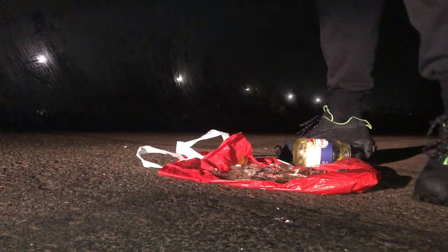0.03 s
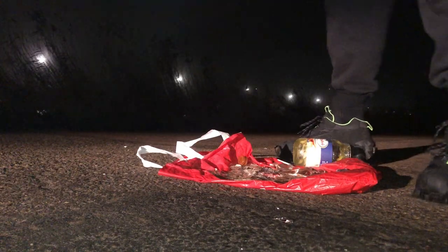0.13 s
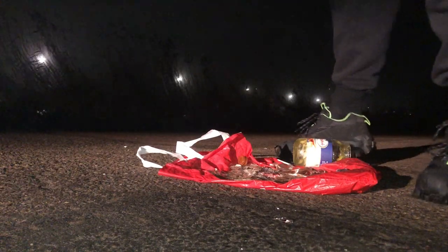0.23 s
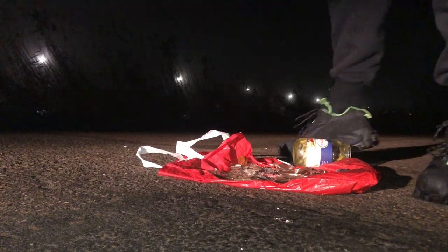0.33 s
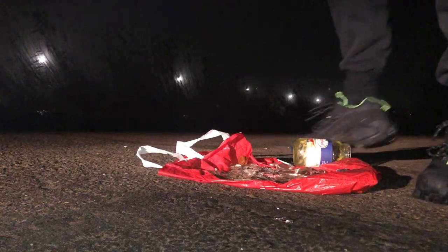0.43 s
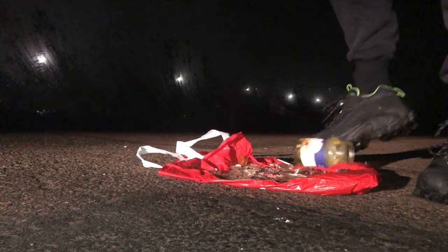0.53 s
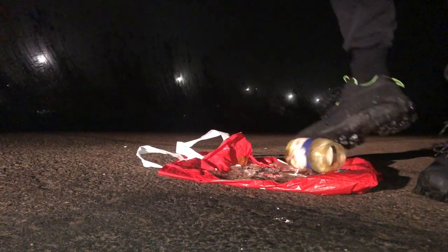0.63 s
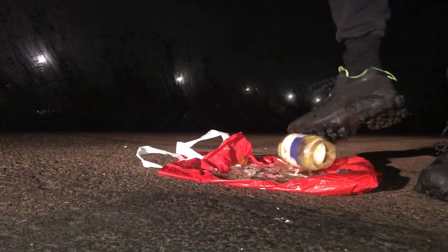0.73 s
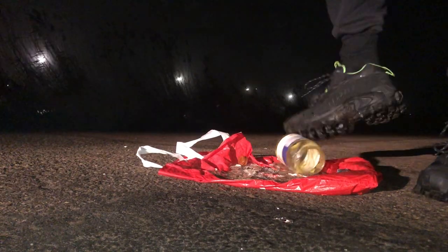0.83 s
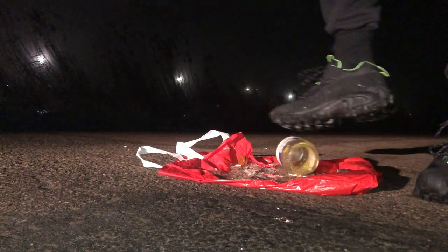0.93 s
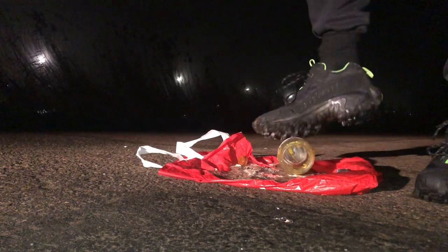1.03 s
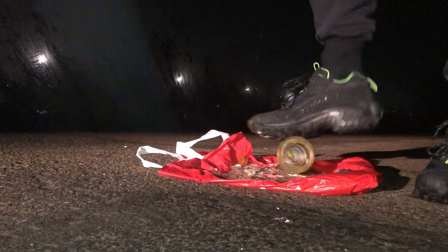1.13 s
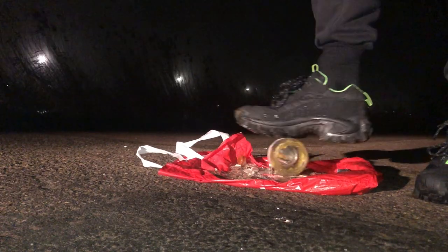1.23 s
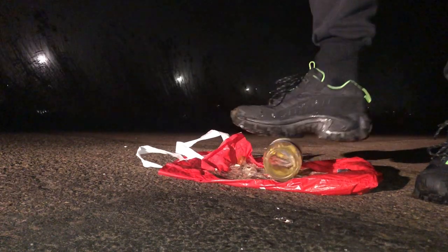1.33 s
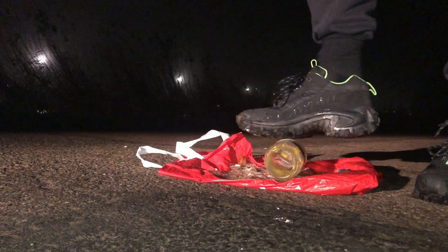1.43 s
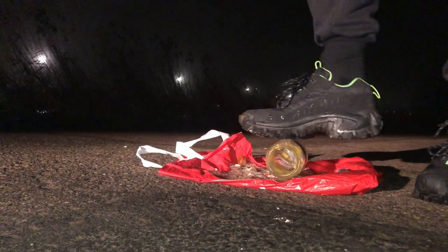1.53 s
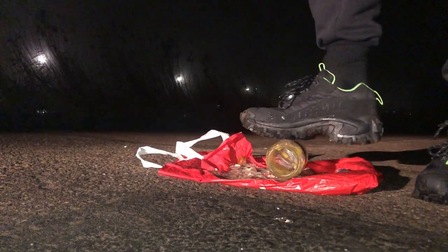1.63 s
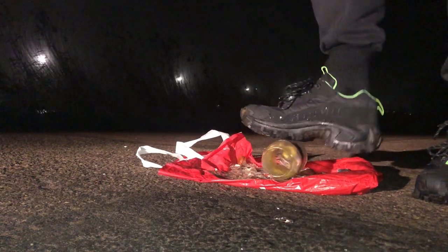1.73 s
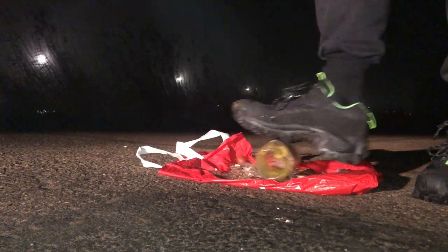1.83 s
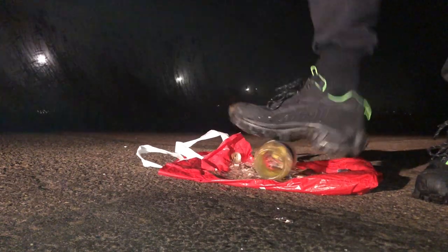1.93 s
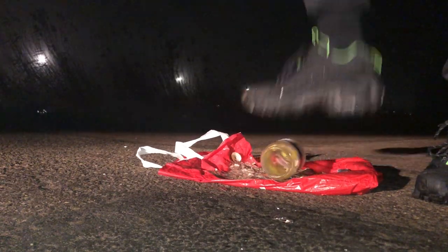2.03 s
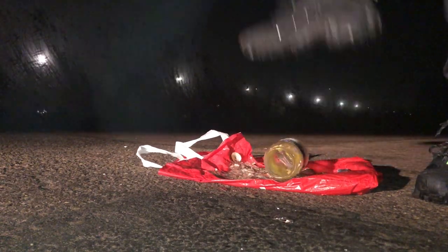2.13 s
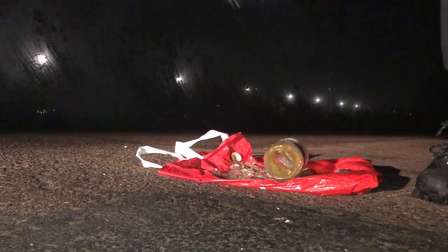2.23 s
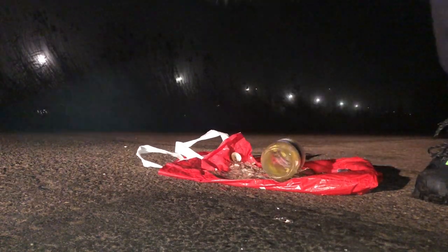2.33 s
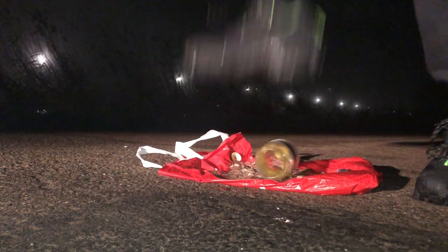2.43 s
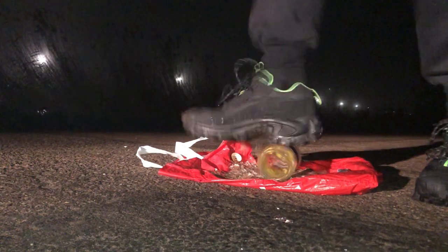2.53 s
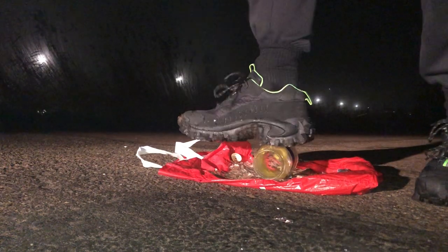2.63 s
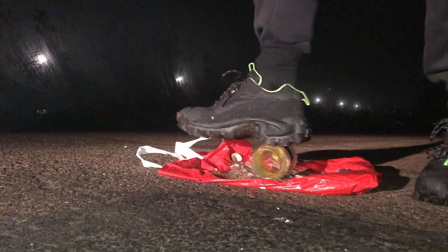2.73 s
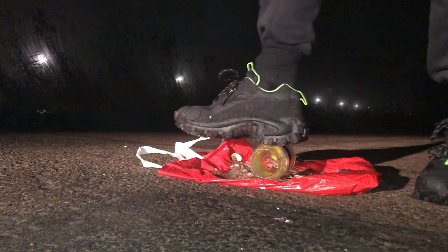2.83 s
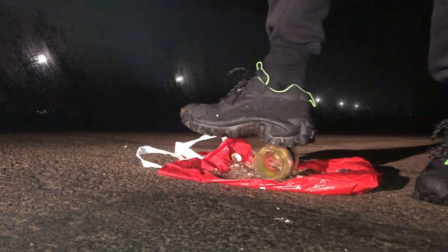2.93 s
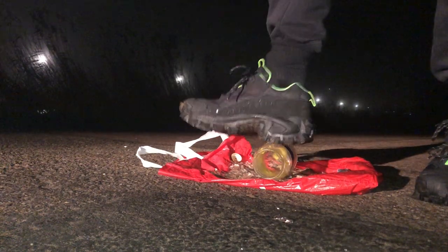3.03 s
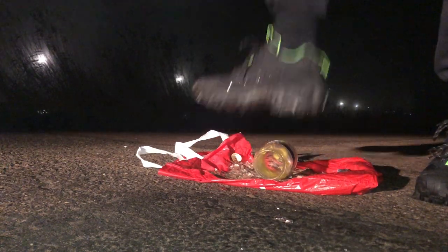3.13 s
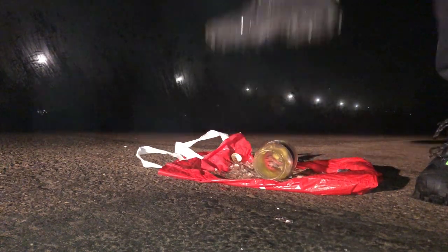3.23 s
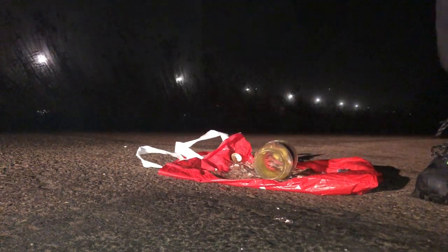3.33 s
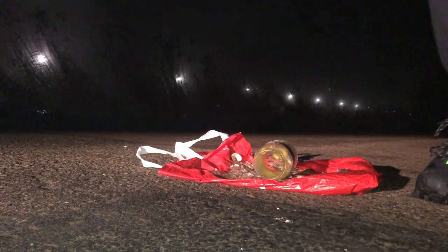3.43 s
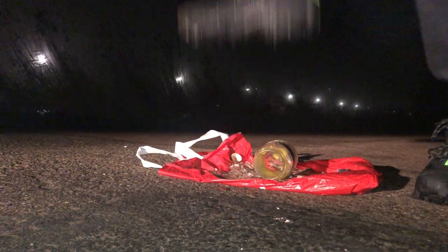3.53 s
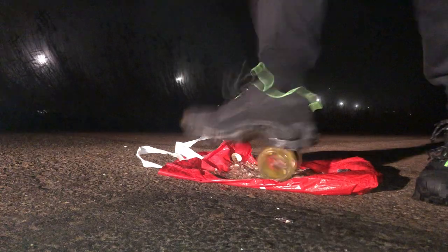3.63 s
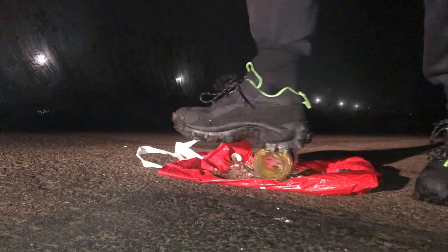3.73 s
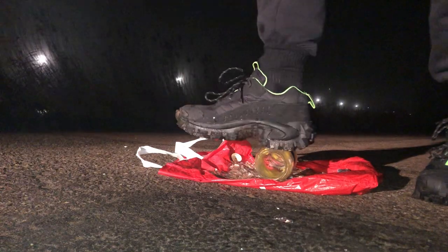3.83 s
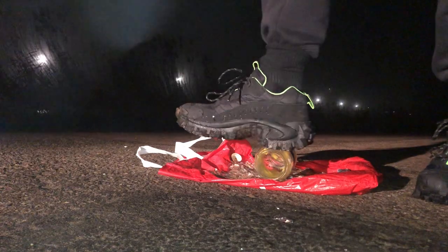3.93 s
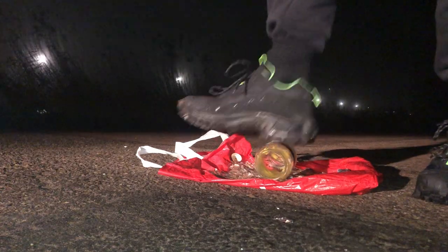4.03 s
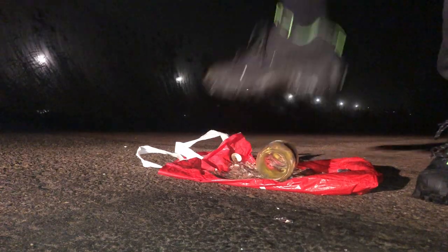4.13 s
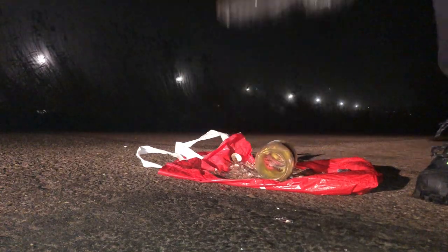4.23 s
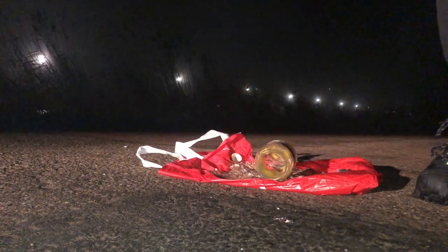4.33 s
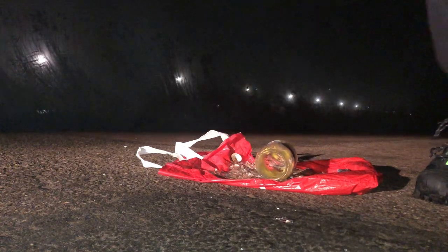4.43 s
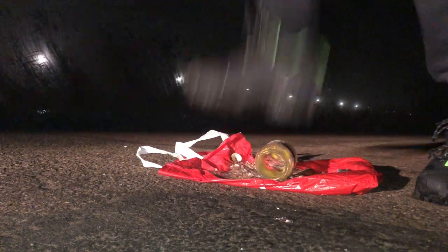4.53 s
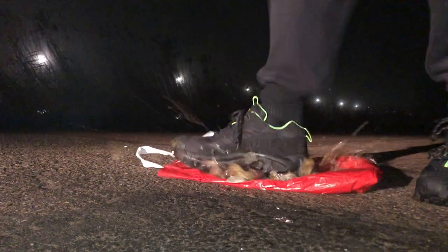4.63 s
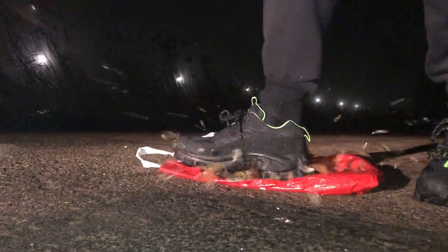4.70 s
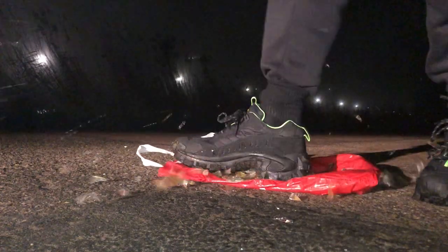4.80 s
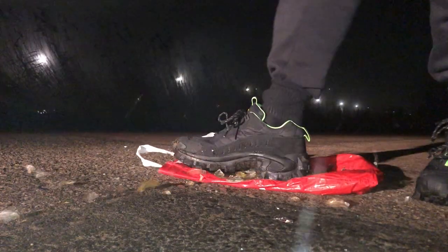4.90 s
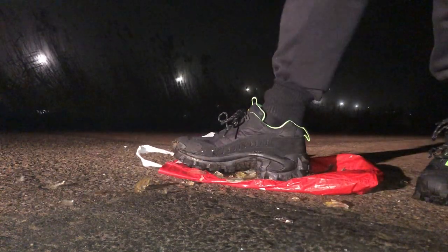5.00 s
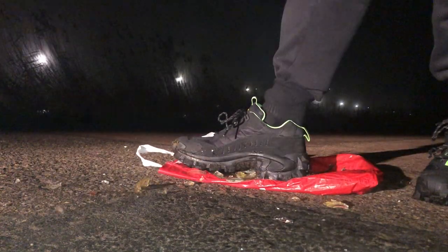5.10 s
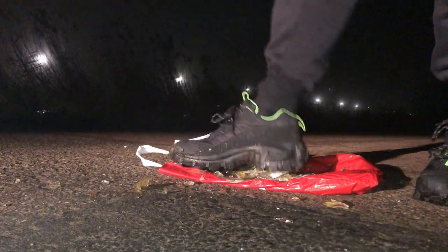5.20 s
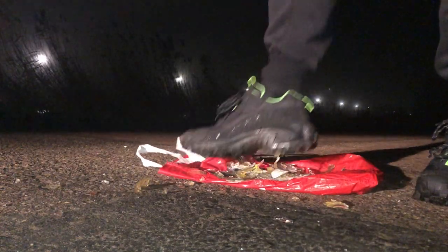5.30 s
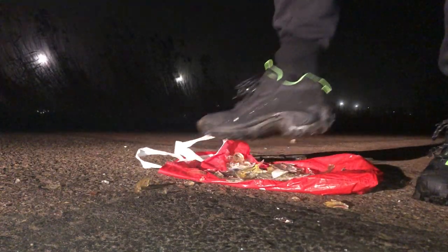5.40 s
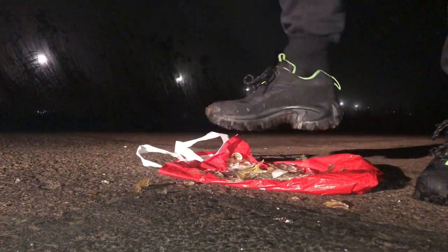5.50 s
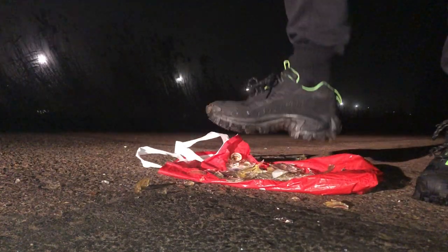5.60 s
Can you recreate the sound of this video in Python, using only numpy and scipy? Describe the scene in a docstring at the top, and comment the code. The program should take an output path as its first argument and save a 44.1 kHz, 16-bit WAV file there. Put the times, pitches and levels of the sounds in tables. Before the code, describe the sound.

Glass clinks and grinds under a boot until a jar shatters on the third stomp, with a faint engine idling behind.

```python
"""A glass jar is rolled by a boot over broken glass on a plastic bag, stamped on three times and smashed.
The shards grind in many tiny slips, which scrape the bag, ring the jar's wall and make the air inside boom.
After the smash, splinters skip over the asphalt, each with its own high note.
A few dull bumps and a brief opening hiss are heard too; behind it all an engine idles over a town's hum."""
import sys
import numpy as np
from scipy import signal
from scipy.fft import rfft, irfft, next_fast_len
from scipy.io import wavfile
from scipy.ndimage import uniform_filter1d, map_coordinates

SR = 44100
rng = np.random.default_rng(int(sys.argv[2]) if len(sys.argv) > 2 else 0)


def persist_wave(psi):
    """Save psi, clipped to +-1, as 16-bit WAV."""
    counts = np.round(np.clip(psi, -1, 1) * 32767).astype(np.int16)
    wavfile.write(sys.argv[1], SR, np.atleast_2d(counts).T)


N = 249606

# A ring_s or echo_s is the time to fade by 60 dB. In an event, other _db columns add to its level_db.
# The notes of the jar's glass wall: pitch_hz, level_db, ring_s
JAR_NOTES = [(2462, -16, .14), (3020, -6, .02), (4035, -17, .11), (5058, -13, .11), (5547, -9, .14),
             (5790, -21, .11), (6765, -13, .06), (6900, -12, .1), (7190, -8, .07), (7652, -16, .08),
             (8428, -4, .065), (8584, -5, .065), (9060, -16, .06), (9680, -10, .055), (10940, -9, .045),
             (12400, -11, .04), (14420, -10, .04)]
# The note of the air in the jar, higher when its mouth lies free: time_s, pitch_hz
AIR_PITCH = [(0, 410.6), (1.3, 424.8), (1.9, 412.6), (2.6, 400.3), (3.82, 395.6), (3.92, 417),
             (5.66, 416.5)]
# Glass grinding on glass, at full strength from start_s; a rise or fall spans 20 dB:
# start_s, level_db, rise_s, hold_s, fall_s, bag_db, air_db
GRINDS = [(.521, -45, .004, .14, .02, 4, -10), (.671, -36, .002, .012, .05, -4, -6),
          (.716, -37, .004, .03, .035, -6, -32), (.881, -33, .003, .022, .018, -10, -35),
          (.79, -56, .03, .33, .05, 2, -4), (1.146, -31, .003, .02, .04, -14, -18),
          (1.182, -23, .008, .026, .016, -17, -22), (1.25, -28, .008, .04, .03, -17, -14.5),
          (1.314, -30, .02, .04, .022, -11, -14), (1.395, -36, .03, .045, .035, -10, -10.5),
          (1.47, -53, .03, .07, .03, -5, -5), (1.552, -31, .02, .022, .06, -24, -22),
          (1.728, -58, .06, .01, -0.05, -7, 5), (1.79, -47, .03, .05, .1, -10, -18),
          (1.861, -28, .002, .005, .04, -4.5, -3), (1.922, -24, .04, .022, .06, -11.5, -15),
          (2.004, -34.5, .01, .008, .03, -4.5, -15), (2.035, -35, .02, .005, .04, -28.5, -14),
          (2.1, -66, .05, .45, .05, 4, -10), (2.583, -17, .001, .01, .06, -8, -25),
          (2.612, -24, .01, .015, .04, -12, -13), (2.655, -27, .005, .005, .05, -1, -15),
          (2.675, -27, .03, .02, .055, -11, -3), (2.775, -40, .03, .02, .03, -8, -20),
          (2.81, -30, .008, .015, .04, -5.5, -9), (2.84, -27, .03, .01, .03, -28, -15),
          (2.9, -52, .05, .03, .05, -4, -10), (2.968, -39, 0.09, .01, .04, -12, -30),
          (3.0, -32, .03, .02, .022, -14, -5), (3.07, -47, 0.1, .01, .08, -17, -12),
          (3.709, -16, .001, .015, .03, -10, -6), (3.735, -27, .01, .012, .025, -8, -12),
          (3.781, -28, .002, .005, .02, 3, -1), (3.81, -53, .02, .3, .04, -3, -8),
          (3.862, -33, .008, .02, .06, -15, -13.5), (3.93, -41.5, .03, .035, .03, -11, -4),
          (4.036, -41, .005, .02, .015, -17, -4), (4.1, -66, .05, .5, .03, 2, -10),
          (4.638, -46, .004, .012, .01, 9, -5)]
# The sole grinding the smashed pieces, timed the same way: start_s, level_db, rise_s, hold_s, fall_s, bag_db
CRUSHES = [(4.654, -18, .002, .008, 0.0134, 4), (4.682, -23, .02, .012, 0.01, -10),
           (4.71, -31, .02, .015, 0.03, -4), (4.76, -42, .05, .06, 0.15, -10.5),
           (4.86, -42, .08, .04, 0.13, -15), (4.93, -45, .03, .03, .045, -24), (5.0, -58, .1, .22, .25, -7),
           (5.24, -52, .01, .025, .02, -8), (5.452, -47, .003, .005, 0.08, -13),
           (5.61, -53, .01, .025, .03, -11)]
# The bright tone of gritty shards: pitch_hz, level_db
SHARD_TONE = [(880, -46), (1500, -23), (1800, -21), (4540, -5), (5020, -6), (6440, -11), (10100, -4),
              (11800, -6), (14600, -5), (16300, -11)]
# The duller tone of the scraped bag: pitch_hz, level_db
BAG_TONE = [(250, 5), (600, -2), (1100, 1), (2000, -3), (3500, -2), (6000, -48.5)]
# Sharp contacts on the unbroken jar: start_s, level_db, pitch_hz, knock_db
CLINKS = [(0.3658, -41, 3110, -17), (0.5246, -25, 2570, -17), (0.565, -27.5, 5570, -21),
          (0.5733, -26.5, 5650, -17), (0.603, -23, 3780, -19), (0.62, -29, 3120, -23),
          (0.669, -14, 2650, -11), (0.7133, -21, 2620, -25), (0.742, -21, 2590, -25),
          (0.766, -32, 5260, -16), (0.799, -30, 2220, -20), (0.84, -40, 3130, -12),
          (0.8786, -16, 2590, -31), (0.8898, -20, 4420, -31), (0.9428, -29, 4300, -23),
          (1.0273, -35.5, 9100, -15), (1.047, -42, 3390, -9), (1.0945, -35, 5140, -19),
          (1.1448, -25, 6740, -27), (1.18, -15, 13100, -36), (1.1858, -12.5, 6900, -29),
          (1.246, -21, 10900, -32), (1.2545, -16, 11100, -29), (1.2794, -18.5, 7250, -30),
          (1.3162, -19, 10100, -26), (1.3514, -21, 7540, -31), (1.4094, -22, 10500, -25),
          (1.423, -23, 8490, -20), (1.4636, -30, 5070, -22), (1.4794, -33.5, 5560, -23),
          (1.5539, -20.5, 8500, -31), (1.5874, -24, 14400, -28), (1.6152, -31, 4430, -21),
          (1.7779, -19.5, 10000, -32), (1.796, -22.5, 5100, -22), (1.8245, -16, 4460, -13),
          (1.8607, -2.5, 4390, -27.5), (1.8778, -13.5, 4800, -23), (1.8904, -21.5, 12600, -22.5),
          (1.901, -18, 10800, -22), (1.915, -9.5, 11000, -26.5), (1.924, -6, 10300, -31),
          (1.936, -4.5, 10000, -15), (1.9525, -2.5, 8410, -23), (2.0055, -10, 12600, -14),
          (2.0334, -19.5, 8480, -29), (2.279, -40.5, 3170, -10), (2.3326, -40, 4270, -10),
          (2.4124, -36, 3390, -17), (2.5817, -1, 9810, -22), (2.5908, -5, 7120, -20),
          (2.611, -10, 7200, -21.5), (2.6519, -6, 3010, -4), (2.6814, -15.5, 8400, -14),
          (2.727, -19.5, 5500, -8), (2.7794, -28, 8600, -14), (2.806, -20, 8200, -16),
          (2.8427, -8.5, 13100, -11), (2.921, -28.5, 13200, -23), (2.9718, -27, 8400, -5),
          (2.9999, -17.5, 8340, -20), (3.071, -31, 8450, -19), (3.0949, -37, 8410, -13),
          (3.1494, -44, 2540, -10), (3.7085, -8.5, 2850, 0), (3.7189, -6, 6900, -14.5),
          (3.7806, -9.5, 8340, -16), (3.8625, -15.5, 8570, -12), (3.929, -25, 13100, -17),
          (3.9524, -21.5, 12700, -12), (4.0334, -35, 8460, -22), (4.151, -38, 3110, -17),
          (4.2005, -39, 2040, -18)]
# Blows of the sole, several to a stamp: start_s, level_db, pitch_hz, ring_s, thump_db, crack_db
BOOT_BLOWS = [(2.583, -20.5, 1050, 0.023, -26, -12), (2.597, -17.5, 1174, .01, -32, -22),
              (3.708, -4, 1035, .017, -10, -27.5), (3.72, -11, 1413, .0084, -19.5, -9),
              (3.731, -15.5, 1030, 0.0086, -20.5, -18.5), (3.781, -13, 950, 0.0089, -28, -14),
              (4.637, -21.5, 1110, 0.0043, -21, -12), (4.653, -3, 1110, 0.012, -17.5, -15.5),
              (4.658, -9, 706, 0.01, -17.5, -1.5), (4.684, -14, 1500, 0.0074, -20.5, -10),
              (4.695, -16, 1050, 0.0078, -25, -20)]
# Splinters landing: start_s, level_db, pitch_hz, ring_s, click_db
SPLINTERS = [(4.703, -36, 11000, 0.067, -5), (4.711, -38, 4500, .03, -11), (4.78, -44, 11300, 0.052, 14),
             (4.812, -45, 5660, 0.14, -3), (4.89, -48, 5620, .15, -3), (4.841, -36, 1100, .012, -20),
             (4.834, -32, 11000, 0.042, 5), (4.85, -34, 10800, 0.027, 1), (4.869, -19.5, 14400, .025, 0),
             (4.883, -24.5, 8260, 0.015, -7), (4.895, -38, 13300, .03, -4), (4.896, -33, 10900, 0.024, -3),
             (4.91, -34.5, 5630, 0.024, 13), (4.916, -28, 15400, 0.032, -3), (4.92, -32, 8300, 0.02, -10),
             (4.924, -54, 12500, .1, -1), (4.937, -24, 13900, .03, -10), (4.948, -34, 10400, 0.022, 9),
             (4.952, -30, 6110, 0.082, -11), (4.971, -40, 8400, 0.018, 10), (4.99, -35, 15400, .03, 2),
             (5.008, -40, 15300, 0.027, 11), (5.021, -50, 4450, .09, -10), (5.044, -47, 6100, 0.035, 10),
             (5.063, -43, 12400, 0.11, -6), (5.078, -45, 12800, .02, 16),
             (5.102, -38.5, 15700, 0.018, 12.5), (5.125, -64, 14600, 0.042, -1),
             (5.141, -42, 12400, 0.045, 0), (5.176, -48, 6100, 0.092, -7), (5.198, -42, 6110, 0.088, -4),
             (5.197, -48, 14600, 0.024, 15.5), (5.241, -37.5, 15500, .02, 15), (5.254, -38, 4150, 0.028, 5),
             (5.309, -56, 12460, .03, 0), (5.374, -54.5, 12400, .04, -3), (5.407, -43, 15500, 0.038, 10),
             (5.45, -36, 7840, 0.092, 5.5), (5.45, -39, 12000, .06, -8), (5.611, -45.5, 9000, 0.015, 13),
             (5.626, -30, 15100, 0.019, 2.5), (5.65, -50, 7870, 0.072, 1)]
# Dull low bumps: start_s, level_db, pitch_hz, ring_s
BUMPS = [(1.455, -13, 164, 0.021), (2.095, -19, 129, 0.038), (2.132, -18.5, 159, 0.079),
         (2.242, -17, 75.4, 0.053), (3.449, -26, 250, 0.08), (4.502, -33.5, 240, 0.13)]
# How long the surroundings echo: pitch_hz, echo_s
ECHO_TIMES = [(300, .2), (3000, 0.076), (14000, 0.071)]
# The tone of the opening hiss: pitch_hz, level_db
HISS_TONE = [(2500, -18), (4000, -4), (5000, 7), (5600, -7), (7400, -4), (9500, -8), (11500, -4.5),
             (14000, -7), (16000, -14.5)]
# How fast the engine fires: time_s, rate_hz
FIRING_RATE = [(0, 23.4), (3.6, 23.4), (3.95, 24.1), (5.66, 24.2)]
# The engine's notes: multiple (of the firing rate), level_db (compared with the town's hum)
ENGINE_NOTES = [(3, -17.5), (4, -25), (5, -11.5), (6, -15.5), (7, -22), (8, -12.5), (9, -26.5), (10, -14.5),
                (11, -16), (12, -20), (13, -13.5), (14, -21.5), (17, -22.5), (21, -17), (22, -27)]
# The tone of the town's far hum: pitch_hz, level_db
TOWN_TONE = [(12, -53), (20, -22), (48, 0), (124, -2.5), (312, -5), (437, -10), (518, -5), (666, -21),
             (788, -14), (959, -19), (1780, -21), (3390, -29.5), (3690, -28), (14200, -43.5), (16300, -59)]
# Bands that stand out of that hum: pitch_hz, width_hz, boost_db
TOWN_BANDS = [(528, 84, 2.5), (792, 16, 5.5), (1706, 330, 7), (3260, 350, 10.5), (4140, 400, 5.5),
              (6660, 260, 4)]

ROLL_END_S, SMASH_S = 1.7, 4.658  # the sole stops rolling the jar; the jar breaks


def grinding():
    """Clumps of tiny slips hiss in the shards, scrape the bag, ring the jar's wall and shake its air."""
    rubs = GRINDS + CRUSHES
    slips = unit(amp(1.5 * wobble(70) + 4.3 * wobble(400)))
    plain_noise = rng.standard_normal(N)

    def rubbed(strength, noise, tone):
        return filtered(slips * strength * noise, tone) / np.std(filtered(plain_noise, tone))

    shards = rubbed(swell(rubs, [-3.7] * len(rubs)), unit(patchy_noise(depth_db=2.5)), tone_of(SHARD_TONE))
    bag = rubbed(swell(rubs, [row[5] for row in rubs]), rng.standard_normal(N), tone_of(BAG_TONE))
    wall_db = [-13 if row[0] < ROLL_END_S else -5 for row in GRINDS]  # the rolling sole muffles the wall
    turning = unit(patchy_noise(depth_db=6))  # other notes ring as the jar turns
    wall = rubbed(swell(GRINDS, wall_db), turning, ringing(JAR_NOTES))
    unbroken = np.arange(N) < SMASH_S * SR
    return shards + bag + unbroken * (wall + jar_air())


def jar_air():
    """Grinding shakes the air in the jar, which booms on one wavering note."""
    hollow = ringing([(408, 0, .045)])
    shake = np.sin(2 * np.pi * np.cumsum(over_time(AIR_PITCH)) / SR + 1.7 * wobble(30))
    strength = swell(GRINDS, [row[6] for row in GRINDS])
    return filtered(strength * shake, hollow) / np.std(filtered(shake, hollow))


def clinks():
    """Each contact gives a crack, pings of loose shards, a knock and a new mix of the jar's notes."""
    t = np.arange(SR // 3) / SR
    cracks, out = np.zeros(N), np.zeros(N)
    note_hz, note_db, ring_s = np.transpose(JAR_NOTES)[:, :, None]
    shape = fade(t, ring_s=.015) * rise(t, rise_s=.0006)
    for start_s, level_db, pitch_hz, knock_db in CLINKS:
        add(cracks, start_s, amp(level_db - 7.5) * shape * rng.standard_normal(len(t)))
        loose_shards = sine(t, rng.uniform(2500, 15500, size=(4, 1))).sum(axis=0)
        pings = shape * (.5 * sine(t, pitch_hz) + .22 * loose_shards)
        knock = amp(knock_db) * fade(t, ring_s=.0092) * sine(t, rng.uniform(900, 2000))
        ring_share = .45 if start_s < ROLL_END_S else 1  # the rolling sole cuts the ring short
        strengths = amp(note_db - 27 + rng.normal(0, 3.5, note_hz.shape))
        notes = strengths * fade(t, ring_s * ring_share) * sine(t, note_hz)
        add(out, start_s, amp(level_db) * (pings + knock + notes.sum(axis=0)))
    gritty = tone_of(SHARD_TONE)
    return out + filtered(cracks, gritty) / np.std(filtered(rng.standard_normal(N), gritty))


def stamps():
    """The sole hits the glass: a short slap, a low thump that sinks in pitch and a noisy crack."""
    t = np.arange(SR // 8) / SR
    out = np.zeros(N)
    sinking_note = sine(t * (1 - 7 * t), pitch_hz=307)
    for start_s, level_db, pitch_hz, ring_s, thump_db, crack_db in BOOT_BLOWS:
        slap = fade(t, ring_s) * rise(t, rise_s=.00096) * sine(t, pitch_hz)
        thump = amp(thump_db) * fade(t, ring_s=.022) * rise(t, rise_s=.0006) * sinking_note
        crack = amp(crack_db) * fade(t, ring_s=.017) * rng.standard_normal(len(t))
        add(out, start_s, amp(level_db) * (2.2 * slap + 4.15 * thump + crack))
    return out


def splinters():
    """A small shard clicks as it lands and rings on one clear note."""
    t = np.arange(SR // 4) / SR
    out = np.zeros(N)
    for start_s, level_db, pitch_hz, ring_s, click_db in SPLINTERS:
        click = amp(click_db) * fade(t, ring_s=.0014) * np.diff(rng.standard_normal(len(t) + 1))
        note = fade(t, ring_s) * sine(t, pitch_hz)
        add(out, start_s, amp(level_db) * (note + click))
    return out


def crumbs():
    """Fine crumbs of glass tick at random after the smash, ever fewer and fainter."""
    t = np.arange(SR // 50) / SR
    out = np.zeros(N)
    for wait, height, size in rng.random(size=(420, 3)):
        delay_s = .03 - .35 * np.log(1 - wait)
        level_db = -51 - 10 * delay_s + 21 * size ** 3
        pitch_hz = 3600 * 4.2 ** height
        ring_cycles = 4 + 70 * (size * height) ** 3
        add(out, SMASH_S + delay_s, amp(level_db) * fade(t, ring_cycles / pitch_hz) * sine(t, pitch_hz))
    return out


def bumps():
    """Soft low bumps that sink in pitch."""
    t = np.arange(SR // 5) / SR
    out = np.zeros(N)
    for start_s, level_db, pitch_hz, ring_s in BUMPS:
        sinking_note = sine(t * (1 - 3 * t), pitch_hz)
        add(out, start_s, amp(level_db - 6) * fade(t, ring_s) * rise(t, rise_s=.00096) * sinking_note)
    return out


def echo(sound):
    """The ground and things nearby throw back a short echo, in which low notes last longest."""
    hz, t, spectrum = signal.stft(rng.standard_normal(SR // 3), SR, nperseg=256)
    echo_s = at_pitch(ECHO_TIMES, hz)[:, None]
    tail = signal.istft(spectrum * fade(t, echo_s), SR, nperseg=256)[1]
    delayed = np.pad(sound, (200, 0))
    return signal.fftconvolve(delayed, tail / np.linalg.norm(tail))[:N]


def hiss():
    """A thin hiss near 5 kHz fades out at the start."""
    hold_s, fade_db_per_s = .07, 137
    level_db = -48 - fade_db_per_s * np.maximum(np.arange(N) / SR - hold_s, 0)
    return amp(level_db) * unit(filtered(patchy_noise(depth_db=1.5), tone_of(HISS_TONE)))


def engine():
    """An idling engine's steady firing makes a stack of low notes, each wavering a little."""
    phase = 2 * np.pi * np.cumsum(over_time(FIRING_RATE)) / SR
    out = np.zeros(N)
    for multiple, level_db in ENGINE_NOTES:
        strength = np.sqrt(2) * amp(level_db + 1.5 * wobble(4))
        out += strength * np.cos(multiple * phase + .25 * wobble(3))
    return out


def town_hum():
    """The far town is a deep, gently wavering noise with a few louder bands."""
    def tone(hz):
        boost_db = sum(db / (1 + (2 * (hz - centre) / width) ** 2) for centre, width, db in TOWN_BANDS)
        return amp(at_pitch(TOWN_TONE, hz) + boost_db)

    return amp(-1 + .46 * wobble(3.3)) * unit(filtered(patchy_noise(depth_db=2.07), tone))


def background():
    """Engine and town drop in level at the smash, then slowly start to come back."""
    t = np.arange(N) / SR
    drop_s, return_start_s, return_db_per_s = .12, 5.09, 8.5
    drop_db = 10.5 * np.clip((t - SMASH_S) / drop_s + .5, 0, 1)
    return_db = return_db_per_s * np.maximum(t - return_start_s, 0)
    return amp(-45 - drop_db + return_db) * (engine() + town_hum())


def swell(rubs, extra_db):
    """The combined strength of rubs that each rise, hold and fall along straight lines in dB."""
    t = np.arange(N) / SR
    power = np.zeros(N)
    for (start_s, level_db, *lengths), more_db in zip(rubs, extra_db):
        rise_s, hold_s, fall_s = np.maximum(lengths[:3], .001)
        span = slice(round((start_s - 3 * rise_s) * SR), round((start_s + hold_s + 3 * fall_s) * SR))
        age_s = t[span] - start_s
        below_db = 20 * np.maximum(-age_s / rise_s, np.maximum(age_s - hold_s, 0) / fall_s)
        power[span] += amp(level_db + more_db - below_db) ** 2
    return np.sqrt(power)


def amp(db):
    """Turns decibels into a number to multiply by."""
    return 10 ** (np.asarray(db) / 20)


def unit(x):
    """Scales x to an average power of 1."""
    return x / np.sqrt(np.mean(x ** 2) + 1e-20)


def sine(t, pitch_hz):
    """A pure note."""
    return np.sin(2 * np.pi * pitch_hz * t)


def rise(t, rise_s):
    """Climbs from 0 towards 1 to soften a start."""
    return 1 - np.exp(-t / rise_s)


def fade(t, ring_s):
    """Dies away by 60 dB every ring_s."""
    return amp(-60 * t / ring_s)


def at_pitch(points, hz):
    """Reads between (pitch_hz, value) points, with octaves evenly spaced."""
    pitches, values = np.transpose(points)
    return np.interp(np.log(hz + 1), np.log(pitches + 1), values)


def over_time(points):
    """Joins (time_s, value) points into one value per sample."""
    return np.interp(np.arange(N) / SR, *np.transpose(points))


def wobble(rate_hz):
    """A smooth curve through rate_hz random values a second."""
    values = rng.standard_normal(int(N * rate_hz / SR) + 4)
    return map_coordinates(values, [np.arange(N) * rate_hz / SR])


def patchy_noise(depth_db):
    """Noise with random louder and softer patches in time and pitch."""
    spectrum = signal.stft(rng.standard_normal(N), nperseg=256)[2]
    patches = uniform_filter1d(rng.standard_normal(spectrum.shape), size=2, axis=0)
    patches = uniform_filter1d(patches, size=7, axis=1)
    return signal.istft(spectrum * amp(depth_db * unit(patches)), nperseg=256)[1][:N]


def tone_of(points):
    """A filter curve through (pitch_hz, level_db) points."""
    return lambda hz: amp(at_pitch(points, hz))


def ringing(notes):
    """A filter curve that rings at each (pitch_hz, level_db, ring_s) note."""
    return lambda hz: sum(amp(db) * pitch / (pitch ** 2 - hz ** 2 + 1j * hz * np.log(1000) / (np.pi * ring_s))
                          for pitch, db, ring_s in notes)


def filtered(x, tone):
    """Multiplies each frequency in x by the filter curve tone(hz)."""
    size = next_fast_len(len(x) + SR // 2)
    return irfft(rfft(x, size) * tone(np.fft.rfftfreq(size, 1 / SR)), size)[:len(x)]


def add(track, start_s, sound):
    """Mixes a sound into the track at start_s."""
    part = track[round(start_s * SR):][:len(sound)]
    part += sound[:len(part)]


def scene():
    """Glass and boot close by, engine and town behind."""
    near = grinding() + clinks() + stamps() + splinters() + crumbs()
    return (near + amp(-21.5) * echo(near) + hiss() + bumps() + background())[None]


def record(dry):
    """The microphone loses the deepest bass, adds faint hiss, rounds off peaks and cuts the top treble."""
    bass_hz, treble_hz, peak_limit = 36, 15750, .72
    x = filtered(dry[0], lambda hz: (1j * hz / (bass_hz + 1j * hz)) ** 3)
    x = x + amp(-75.5) * rng.standard_normal(N)
    x = x / (1 + np.abs(x / peak_limit) ** 4) ** (1 / 4)
    treble_cut = lambda hz: amp(-np.clip((hz - treble_hz) / 8, 0, 35)) * (hz < treble_hz + 1050)
    return filtered(x, treble_cut)[None]


dry = scene()
out = record(dry)
persist_wave(out)
```